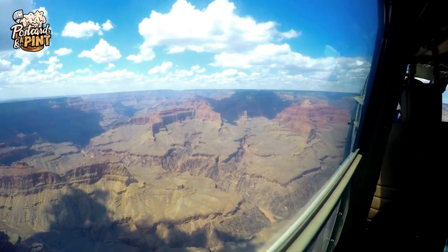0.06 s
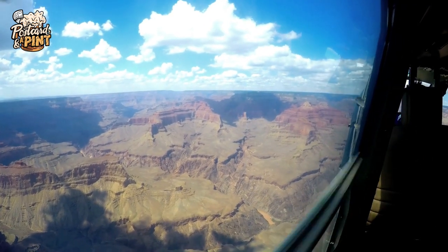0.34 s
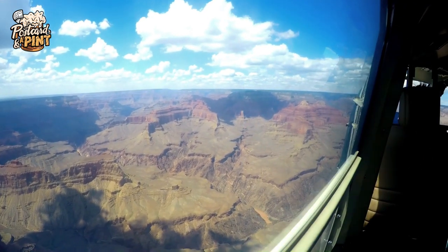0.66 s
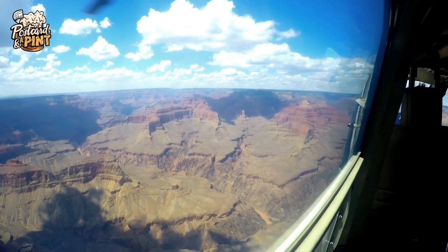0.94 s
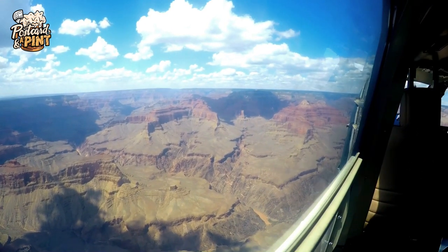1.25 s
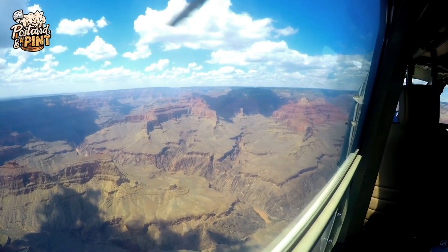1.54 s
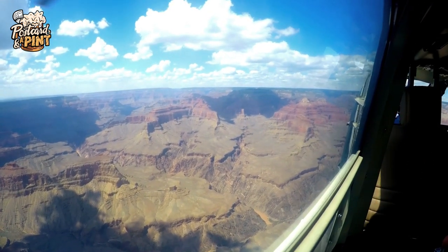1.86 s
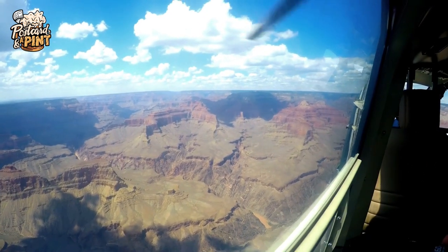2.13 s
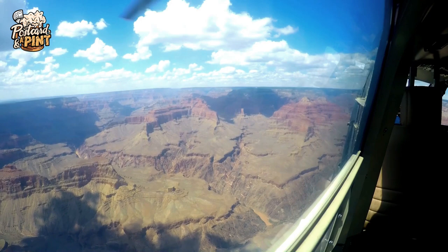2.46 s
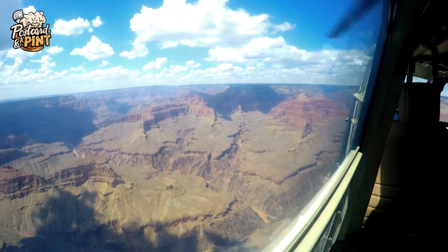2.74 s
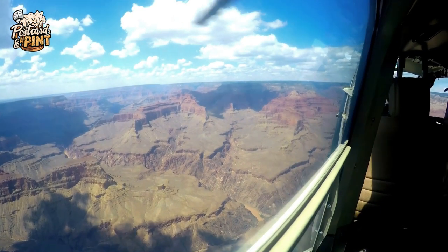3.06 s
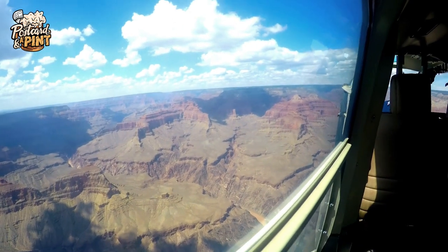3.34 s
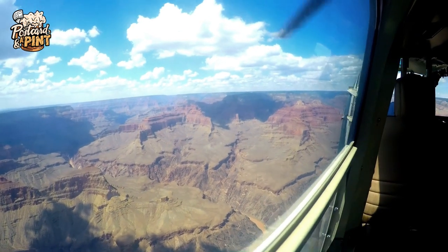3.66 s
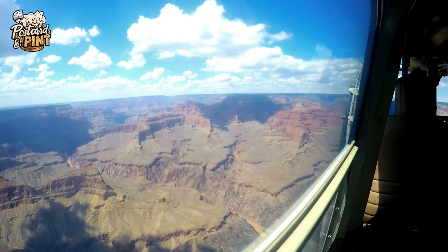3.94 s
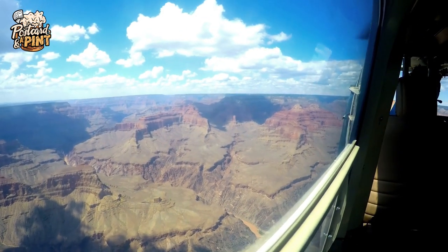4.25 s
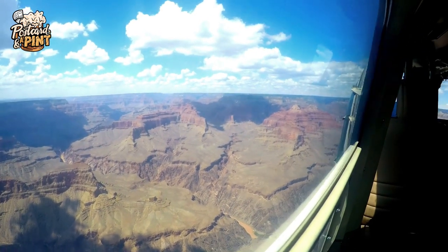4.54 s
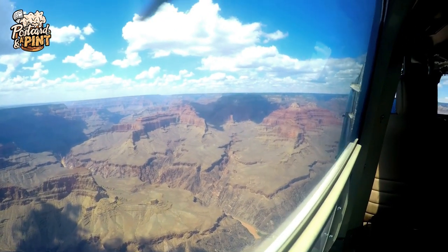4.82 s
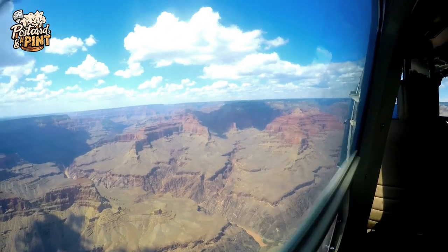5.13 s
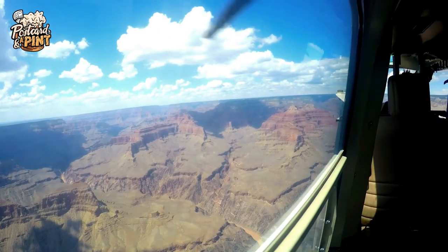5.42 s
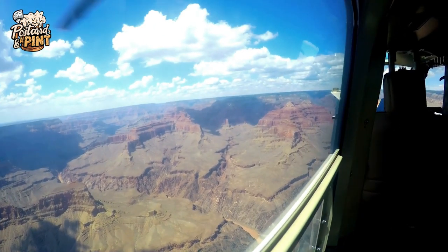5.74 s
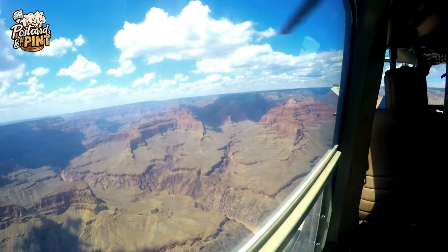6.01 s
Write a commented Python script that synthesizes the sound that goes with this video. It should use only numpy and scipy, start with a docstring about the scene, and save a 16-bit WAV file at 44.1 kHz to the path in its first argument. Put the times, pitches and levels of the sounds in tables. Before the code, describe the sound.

Inside a cruising helicopter, a steady high gear whine flutters over throbbing rotors, engine drone and rumbling air.

```python
"""A gearbox whine near 1.9 kHz, fluttering with every blade pass, inside a turbine helicopter in cruise.
The stereo microphone is in the cabin. Under the whine the two-bladed main rotor throbs, the tail rotor
drones, and shafts and pumps add thinner tones. All around, airflow rumbles on the cabin shell,
and the turbine's compressor hisses far up in the treble."""
import sys
import numpy as np
from scipy.fft import rfft, irfft, next_fast_len
from scipy.io import wavfile
from scipy.ndimage import map_coordinates

SR = 44100
rng = np.random.default_rng(int(sys.argv[2]) if len(sys.argv) > 2 else 0)


def store_pcm(level_fs):
    """Save levels as 16-bit WAV."""
    pcm = np.round(np.clip(level_fs, -1, 1) * 32767).astype(np.int16)
    wavfile.write(sys.argv[1], SR, np.atleast_2d(pcm).T)


N = 272538

MESH_HZ, ROTOR_SHAFT_HZ, TAIL_BLADE_HZ = 1897.9, 6.552, 84.95  # at cruise speed

# Slow drift of the rotor speed. Each row: time in seconds, pitch of the main gear mesh in Hz.
MESH_DRIFT = [(0, 1896.4), (0.45, 1895.9), (0.9, 1900.3), (1.7, 1896.3), (2.7, 1898.9), (3.4, 1905.3),
              (4.2, 1895.9), (4.8, 1894.3), (6.18, 1898.2)]
# Load on the main blades. Each row: time in seconds, throb level in dB (used around its average).
BLADE_LOAD = [(0, -32.5), (1.35, -33.5), (1.8, -30), (2.35, -32), (3.5, -28.5), (4.7, -35.5), (6.18, -34)]
# Air on the cabin shell. Each row: frequency in Hz, relative density in dB.
RUMBLE_SPECTRUM = [(10, -47), (24, -31), (42, -10), (70, -5.5), (125, -1), (200, -4), (270, -9),
                   (370, -11.5), (470, -16), (700, -21.5), (900, -25.5), (1500, -37.5), (3000, -67.5)]
# Hiss of turbine and vents. Each row: frequency in Hz, relative density in dB.
HISS_SPECTRUM = [(400, -17.5), (1200, 4), (2300, -0.5), (2850, -5.5), (3700, -6), (4050, -7.5),
                 (4900, -10.5), (6200, -16), (9500, -22.5), (12000, -27), (15000, -28), (15400, -37)]
# Cabin noise at the microphone. Each row: frequency in Hz, left-right likeness (capped at 1).
NOISE_LIKENESS = [(40, 0.14), (150, 0.9), (400, 0.71), (1000, 0.8), (2000, 1.5), (4000, 0.2), (8000, 0.09),
                  (14000, 0.32)]
# The side the airflow leans to. Each row: frequency in Hz, left over right in dB.
AIR_BALANCE = [(40, 0.92), (300, 1.4), (600, -0.12), (2500, -1.9), (4000, 0.22), (6000, 1.9), (14000, 2)]
# Panel and compressor noise. Each row: centre in Hz, half width in Hz, level in dB, left over right in dB.
NOISE_BANDS = [(1005.5, 40, -50, 0), (3780, 42, -66, -2.5), (14380, 55, -76.5, 1)]
# Shafts, pumps and lesser gears in cruise. Each row: pitch in Hz, level in dB, left over right in dB.
SHAFT_TONES = [(642.5, -48.5, 5), (656, -46, -2), (798.7, -53.2, -9), (984, -60, 0), (1242, -60, -1),
               (1255, -63, -1), (1285, -62, -6), (1298, -57, -8), (1311, -59, -1), (1477, -60, 3),
               (1698, -53.7, 2), (1797.7, -50, 4), (1954.5, -55, 0), (1997.7, -58, 0)]
# High accessory gears in cruise. Each row: pitch in Hz, level in dB, left over right in dB.
ACCESSORY_TONES = [(2495, -72, -1), (2897, -74, 0), (3193, -73.5, -1), (3793, -73, -3), (4347, -77, 3),
                   (4797, -71.5, -2), (5490, -82, 5), (6990, -86, 4)]
# Tail rotor drone. Each row: multiple of its blade rate, level in dB, left over right in dB.
TAIL_HARMONICS = [(1, -42, 5), (2, -33, 2), (3, -53, 4), (6, -50.5, -3)]
# Main rotor throb. Each row: multiple of the shaft rate, relative level in dB, left over right in dB.
ROTOR_ORDERS = [(4, -25, 4), (6, -3.5, -5), (8, -4.5, 3), (9, -12, 1), (10, -16, 3), (11, -16, -2),
                (14, -15, 5), (16, -16, 0), (18, -13, 1), (20, -5, -1), (22, -10, 1), (28, -15, 0)]
# Random vibration of the gear case. Each row: frequency in Hz, relative density in dB.
CASE_SPECTRUM = [(1400, -60), (1650, -17.5), (1730, -7), (1840, 0.5), (1980, 2.5), (2040, -11), (2110, -28),
                 (2300, -61)]
# Torque ripple on the mesh. Each row: multiple of the blade rate, depth from 0 to 1, phase swing in rad.
TORQUE_RIPPLE = [(1, .13, -.25), (2, .115, -.07), (3, .085, .06), (4, .125, .12), (5, .05, .08),
                 (7, .035, -.05)]
# Rise and fall of the gear whine. Each row: time in seconds, level in dB.
WHINE_LEVEL = [(0, -32.5), (0.55, -33.5), (0.95, -30), (1.8, -31), (3.7, -31), (4.7, -33.0), (6.18, -34)]


def amp(db):
    """Decibels to gain."""
    return 10 ** (np.asarray(db) / 20)


def at_hz(points, hz):
    """(Hz, value) points read on a log axis."""
    freqs, values = np.transpose(points)
    return np.interp(np.log(hz + 1), np.log(freqs + 1), values)


def over_time(points):
    """(seconds, value) points read at every sample."""
    return np.interp(np.arange(N) / SR, *np.transpose(points))


def wobble(rate):
    """A smooth random curve, rate knots a second."""
    coarse = np.arange(0, N + 64, 64)
    knots = rng.standard_normal(int(N * rate / SR) + 4)
    return np.interp(np.arange(N), coarse, map_coordinates(knots, [coarse * rate / SR]))


def filtered(x, response):
    """x through a response given as a function of Hz."""
    size = next_fast_len(N + SR // 2)
    return irfft(rfft(x, size) * response(np.fft.rfftfreq(size, 1 / SR)), size)[..., :N]


def sides(difference):
    """A left-right difference, shared out half to each channel."""
    return np.array([[.5], [-.5]]) * difference


def tone(cycles, pan_db):
    """A sine of rms 1, then panned, that runs through the given cycles from a random start."""
    angle = 2 * np.pi * ((cycles + rng.random()) % 1)
    return np.sqrt(2) * amp(sides(pan_db)) * np.sin(angle)


def cabin_noise(colour):
    """Stereo noise of rms 1, most alike on both sides from the upper bass to about 2 kHz."""
    def mid_side_gains(hz):
        turn = np.arccos(np.clip(at_hz(NOISE_LIKENESS, hz), -1, 1)) / 2
        return np.array([np.cos(turn), np.sin(turn)])
    mid, side = filtered(rng.standard_normal((2, N)), mid_side_gains)
    noise = filtered(np.array([mid + side, mid - side]), colour)
    return noise / np.sqrt(np.mean(noise ** 2) + 1e-20)


def shaft_speed(swing_hz=1.85, swings_per_s=3.5, crest_s=.205, settle_s=3.0):
    """Speed over cruise speed: it drifts slowly while the drive shafts twist to and fro and settle."""
    t = np.arange(N) / SR
    twist_hz = swing_hz * np.exp(-t / settle_s) * np.cos(2 * np.pi * swings_per_s * (t - crest_s))
    return (over_time(MESH_DRIFT) + twist_hz) / MESH_HZ


def blade_load_db():
    """Blade load in dB around its average."""
    load_db = over_time(BLADE_LOAD)
    return load_db - load_db.mean()


def airflow(rumble_db=-29, hiss_db=-46, load_share=0.18, buffet_db=0.5):
    """All around the microphone, slipstream rumble swells with the blade load under an even hiss."""
    def air(spectrum):
        return cabin_noise(lambda hz: amp(at_hz(spectrum, hz) + sides(at_hz(AIR_BALANCE, hz))))
    swell_db = load_share * blade_load_db() + buffet_db * wobble(8.2)
    rumble = amp(rumble_db + swell_db) * air(RUMBLE_SPECTRUM)
    hiss = amp(hiss_db + .15 * wobble(12)) * air(HISS_SPECTRUM)
    return rumble + hiss


def resonances():
    """Random vibration of panels and compressor gathers in a few narrow bands."""
    def band(centre, half_width, pan_db):
        return cabin_noise(lambda hz: amp(sides(pan_db)) / (1 + ((hz - centre) / half_width) ** 2))
    return sum(amp(db) * band(hz, half_width, pan) for hz, half_width, db, pan in NOISE_BANDS)


def turbine(overspeed_percent, level_db=-72.3, waver_db=2.7, db_per_percent=-5.5):
    """A faint engine whistle on its own shaft, louder when the rotor sags and calls for power."""
    pitch_hz = 5073 + 4 * wobble(3)
    whistle_db = level_db + db_per_percent * overspeed_percent + waver_db * wobble(5)
    return amp(whistle_db) * tone(np.cumsum(pitch_hz) / SR, pan_db=0)


def drivetrain(clock, overspeed_percent, db_per_percent=-4.0):
    """Shafts, pumps and gears sing thin tones, louder when the rotor sags and the engine pulls harder."""
    def tones(rows, waver_db):
        return sum(amp(db + waver_db * wobble(5)) * tone(hz * clock, pan) for hz, db, pan in rows)
    torque_gain = amp(db_per_percent * overspeed_percent)
    return torque_gain * (tones(SHAFT_TONES, waver_db=.7) + tones(ACCESSORY_TONES, waver_db=1.2))


def tail_rotor(clock, waver_db=0.67):
    """Back on the tail, the blades drone a little unevenly in the main rotor's wake."""
    return sum(amp(db + waver_db * wobble(9.3)) * tone(k * TAIL_BLADE_HZ * clock, pan)
               for k, db, pan in TAIL_HARMONICS)


def main_rotor(clock, level_db=-35.5, waver_db=1.5):
    """Blade pressure pulses from overhead reach the cabin as low shaft orders, stirred by turbulence."""
    throb = sum(amp(db + waver_db * wobble(4)) * tone(k * ROTOR_SHAFT_HZ * clock, pan)
                for k, db, pan in ROTOR_ORDERS)
    return amp(level_db + blade_load_db()) * throb


def gearbox(clock, flutter_db=0.5, rattle_db=-44.0):
    """Close by, the mesh tone is kicked in level and phase by each blade pass, over the case's rattle."""
    blade_passes = 2 * ROTOR_SHAFT_HZ * clock + .5
    strength, shift_rad = 1, 0
    for k, depth, swing_rad in TORQUE_RIPPLE:
        angle = 2 * np.pi * k * blade_passes  # in step, the ripples add up to one short kick per blade
        strength += depth * np.cos(angle)
        shift_rad -= swing_rad * np.sin(angle)
    whine = strength * tone(MESH_HZ * clock + shift_rad / (2 * np.pi), pan_db=-2.0)
    rattle = amp(rattle_db + sides(-1.8)) * cabin_noise(lambda hz: amp(at_hz(CASE_SPECTRUM, hz)))
    # standing waves in the cabin make the tone waver differently on each side of the microphone
    flutter = amp(flutter_db * np.array([wobble(20), wobble(20)]))
    return amp(over_time(WHINE_LEVEL)) * flutter * whine + rattle


def scene(left_lead_s=52e-6):
    """One shaft speed drives rotors and gears; the whole cabin reaches the left channel a little early."""
    speed = shaft_speed()
    clock = np.cumsum(speed) / SR  # seconds as the shafts count them
    overspeed_percent = 100 * (speed - 1)
    rotors = main_rotor(clock) + tail_rotor(clock)
    machinery = gearbox(clock) + drivetrain(clock, overspeed_percent) + turbine(overspeed_percent)
    cabin = rotors + machinery + airflow() + resonances()
    return filtered(cabin, lambda hz: np.exp(2j * np.pi * hz * sides(left_lead_s)))


def record(dry, top_hz=15750):
    """The microphone passes nothing above its band limit."""
    return filtered(dry, lambda hz: hz < top_hz)


dry = scene()
out = record(dry)
store_pcm(out)
```